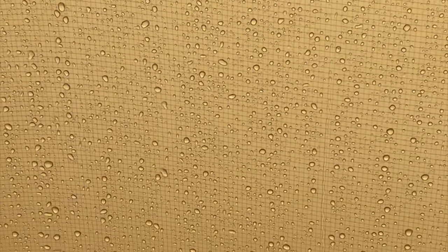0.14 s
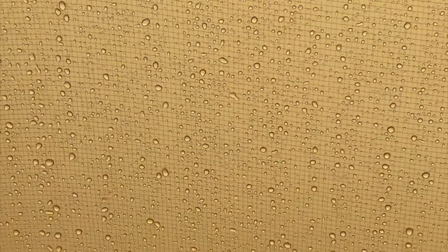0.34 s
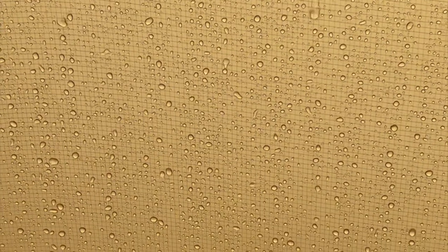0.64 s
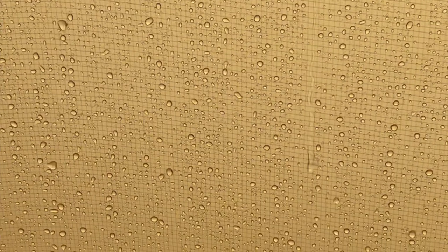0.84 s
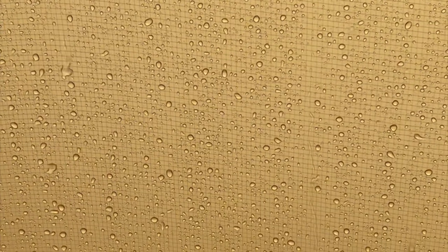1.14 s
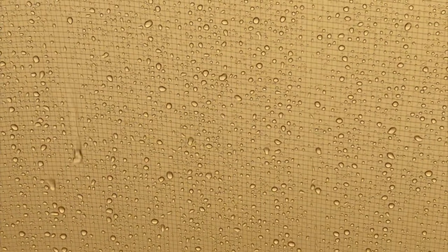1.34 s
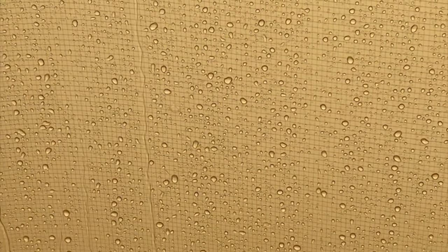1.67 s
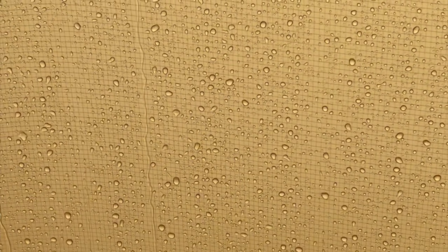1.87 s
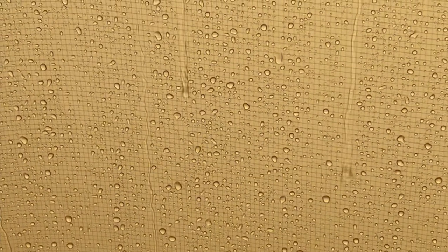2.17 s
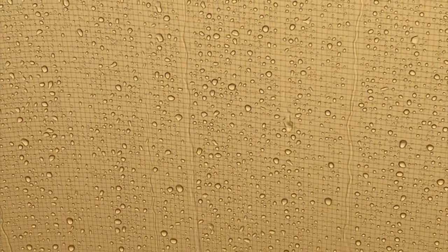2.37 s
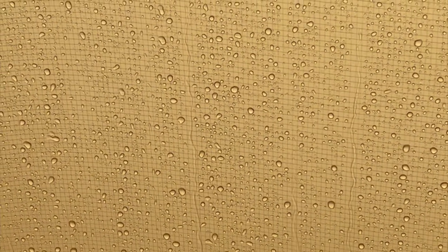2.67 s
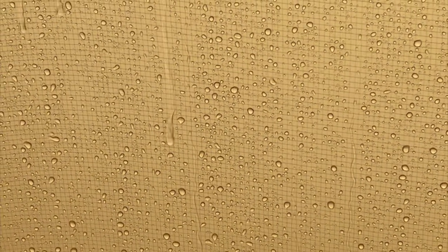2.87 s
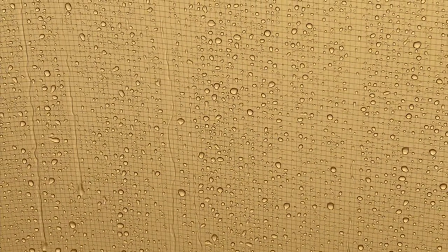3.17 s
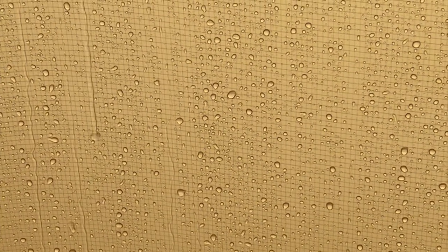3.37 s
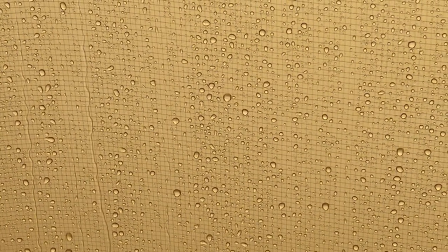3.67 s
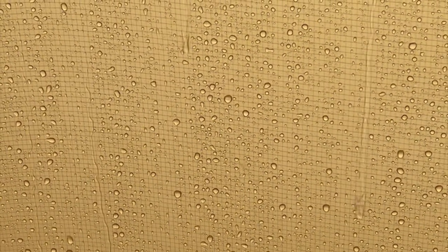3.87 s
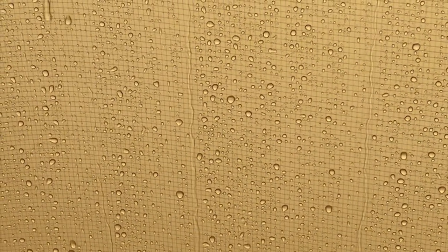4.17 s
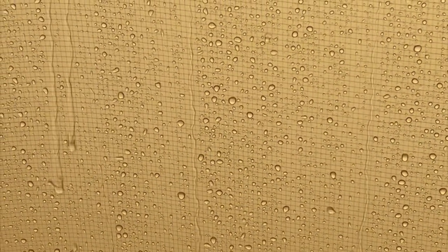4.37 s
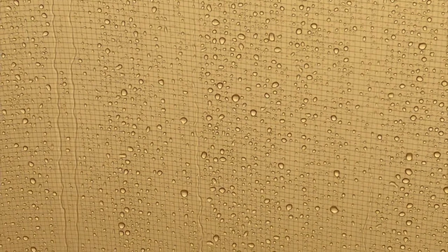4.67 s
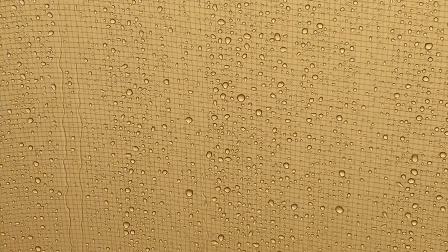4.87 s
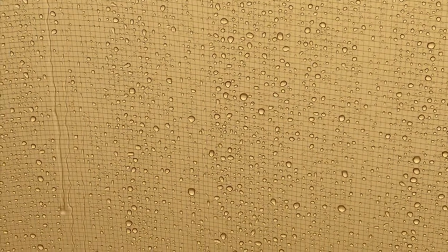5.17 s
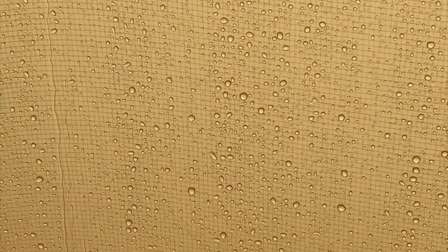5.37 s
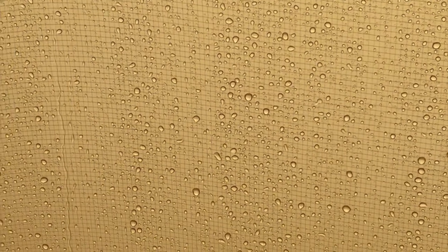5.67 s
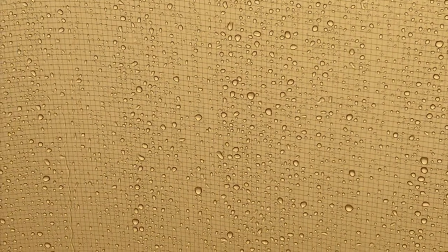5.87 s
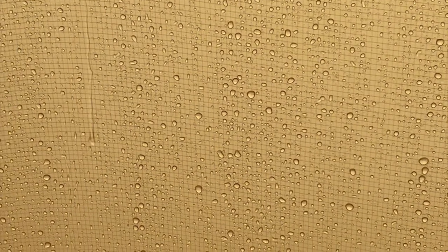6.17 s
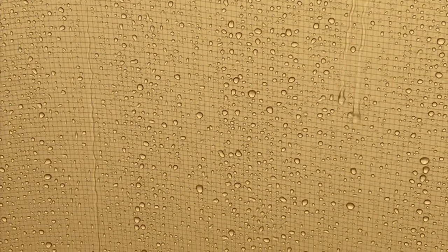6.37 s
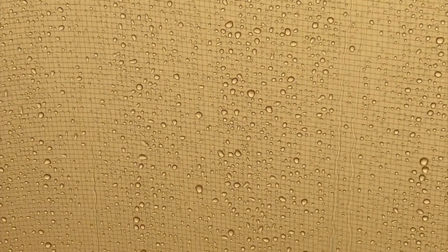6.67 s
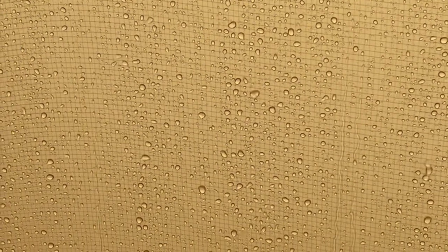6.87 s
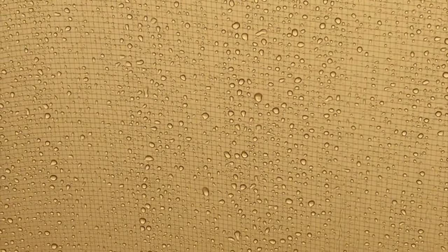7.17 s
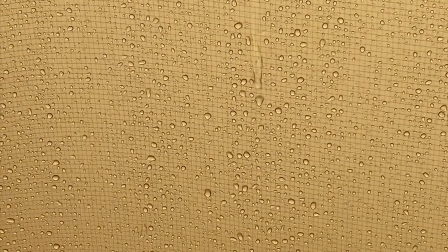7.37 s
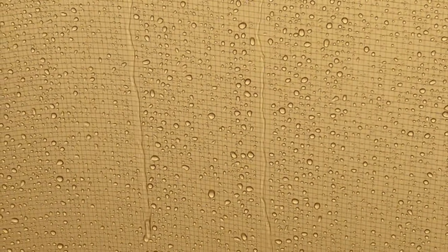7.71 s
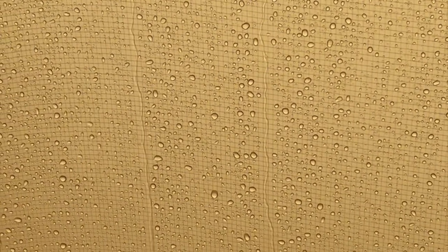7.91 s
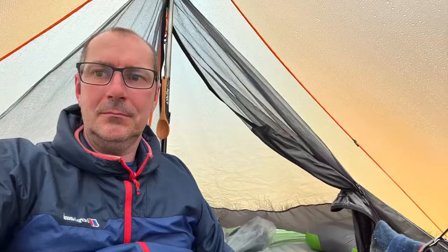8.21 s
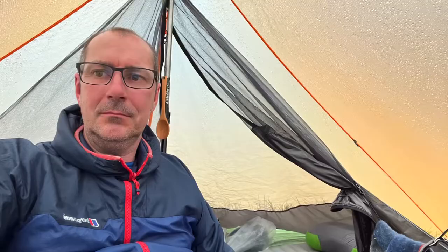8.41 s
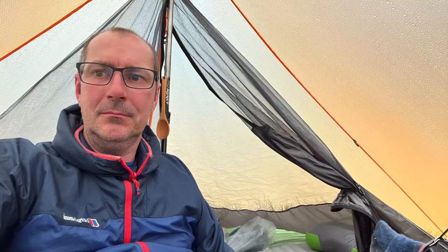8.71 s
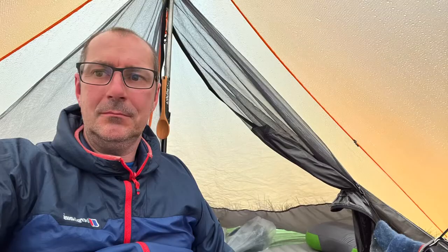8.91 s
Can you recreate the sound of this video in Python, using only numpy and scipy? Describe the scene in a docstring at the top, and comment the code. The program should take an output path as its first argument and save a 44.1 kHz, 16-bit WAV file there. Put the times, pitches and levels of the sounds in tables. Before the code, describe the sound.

Heavy rain on the taut cloth of a small tent, heard from inside with close stereo microphones. Countless tiny ticks and short fabric rattles merge into a dense, mid-bright wash. Occasional bigger drops tap hard nearby. The rain swells and eases slightly with gusts, weakens just after eight seconds, then cuts instantly to silence.

```python
"""Inside a small shelter of taut fabric: heavy rain, heard by a pair of close microphone ports.
Thousands of drops a second tap the cloth. Near ones are a tick and a short rattle, made of clicks
and fading noise; far ones merge into a wash of steady noise.
Gusts swell the rain; the sound is turned down near the end and then cut to silence."""
import sys
import numpy as np
from scipy import signal
from scipy.fft import rfft, irfft
from scipy.io import wavfile

SR = 44100
rng = np.random.default_rng(int(sys.argv[2]) if len(sys.argv) > 2 else 0)


def invert_db(x):
    """Field ratio 10**(x/20) for x, a level in decibels (scalar or array-like)."""
    u = np.asarray(x, float) / 20
    return 10 ** u


def inscribe(sig):
    """Save sig as 16-bit PCM at rate SR to the path in sys.argv[1].

    A 1-D sig is mono; a 2-D sig holds one channel per row.
    Samples are clipped to [-1, 1] before scaling.
    """
    pcm = np.round(np.clip(np.atleast_2d(sig).T, -1, 1) * 32767)
    wavfile.write(sys.argv[1], SR, pcm.astype(np.int16))


N = 399105
TIME_S = np.arange(N) / SR

# The heaviest drops, close by. The level is the peak aimed at; it sets their size against the other drops.
# Columns: t/s, level/dB
HEAVY_DROPS = [(0.133, -15), (0.189, -15), (0.575, -14.5), (1.22, -14), (1.35, -14), (1.492, -14.5),
               (1.878, -17.5), (2.306, -14), (3.133, -16), (4.606, -16.5), (4.781, -15.5), (4.825, -14.5),
               (5.825, -17), (6.622, -16.5), (7.145, -18)]


def drops(per_s, spread_db):
    """Drops land at random in clumps; most are small and a few much bigger. Gives a size where one lands."""
    smallest_db = 11   # peak of the smallest drop, taken over the level of the patter
    clumps = invert_db(1.5 * drift(9.0))
    lands = rng.random(N) < per_s * clumps / SR
    bigger_db = spread_db * np.minimum(rng.exponential(1, N), 3.0)
    sizes = lands * invert_db(bigger_db)
    heavy_s, peak_db = np.transpose(HEAVY_DROPS)
    at = (heavy_s * SR).astype(int)
    sizes[at] = invert_db(peak_db - rain_db()[at] - smallest_db)
    return sizes


def patter(sizes, tick_db, rattle_db, cycles, colour_db):
    """Each drop ticks, then the cloth rattles, losing 60 dB in some cycles of each band; far drops are a wash."""
    hz = np.fft.rfftfreq(N, 1 / SR) + 1   # the 1 avoids the log of zero
    band_hz = np.geomspace(60, 16000, 9)   # about an octave apart
    place = np.interp(np.log(hz), np.log(band_hz), np.arange(len(band_hz)))
    at = np.flatnonzero(sizes)
    signs = rng.choice([-1, 1], len(at))   # a tick may push or pull
    spectrum = 0
    for k, centre_hz in enumerate(band_hz):
        # every drop has a colour of its own: its strength varies from band to band
        ticks = np.zeros(N)
        ticks[at] = sizes[at] * invert_db(colour_db * rng.standard_normal(len(at)))
        fade = invert_db(-120 * centre_hz / (cycles * SR))   # power kept from one sample to the next
        rattle = np.sqrt(signal.lfilter([1 - fade], [1, -fade], ticks ** 2 + 1e-18))
        ticks[at] *= signs
        # steady wash and rattle share one noise; the 1 is the power of the wash
        loudness = np.sqrt(1 + invert_db(2 * rattle_db) * rms_one(rattle) ** 2)
        noise = rng.standard_normal(N) * loudness
        band = noise + invert_db(tick_db) * rms_one(ticks)
        band = band * invert_db(0.51 * drift(4.7))   # the strength of each band wavers slightly
        overlap = np.sqrt(np.clip(1 - abs(place - k), 0, 1))
        spectrum = spectrum + rfft(band) * overlap
    return spectrum, hz


# Tone of the sound the two ports share. Levels are per Hz and count only against each other.
# Columns: f/Hz, level/dB
COMMON_TONE = [(20, -50), (52, -15.5), (86, -11.5), (261, -10), (585, -.5), (1150, 0.5), (1750, -1),
               (2400, -3.5), (3000, -6.5), (4300, -10.5), (5900, -10.5), (8500, -14.5), (10100, -23),
               (11500, -23.5), (12100, -27), (12500, -34)]


def shared_sound(common, hz):
    """What both ports hear alike, with a narrow dip where the ports cancel."""
    dip_hz, width_hz, dip_db, top_hz = 4940, 400, -7, 12420
    dip = dip_db / (1 + (2 * (hz - dip_hz) / width_hz) ** 2)
    return common * invert_db(at_hz(COMMON_TONE, hz) + dip) * (hz < top_hz)


# Tone of what differs between the ports. Levels are per Hz, before a trim common to all of them.
# Columns: f/Hz, level/dB
DIFFERENCE_TONE = [(35, -51.5), (243, -23.5), (727, 1.5), (1330, -3), (1500, -13), (1950, -17),
                   (2400, -6.5), (2850, -4.5), (4030, -7), (5100, -3.5), (5700, -12.5), (7800, -12),
                   (10100, -11.5), (11500, -8), (13000, -10.5), (15800, -18.5)]
# Sound reaching one port first; the sign tells which port.
# Columns: f/Hz, share of the difference that is the common sound a quarter turn late [no unit]
LATE_SHARE = [(300, -.3), (1200, -.2), (2500, .08), (3600, .1), (4500, .48), (5000, .2), (5400, -.28),
              (7000, 0.), (8000, .68), (11800, .68)]


def port_difference(common, other, hz):
    """The ports differ partly by a delay, partly because other paths through the shelter reach them."""
    trim_db, top_hz = -10, 15760
    share = np.clip(at_hz(LATE_SHARE, hz), -1, 1)
    late = -1j * share * common   # -1j is the quarter turn
    other_paths = np.sqrt(1 - share ** 2) * other
    return (late + other_paths) * invert_db(at_hz(DIFFERENCE_TONE, hz) + trim_db) * (hz < top_hz)


# Strength of the rain, as the level of the patter in the shared sound.
# Columns: t/s, level/dB
RAIN_STRENGTH = [(0, -31), (.3, -32), (.85, -32), (1.35, -30), (1.8, -30), (2.05, -32), (2.8, -33),
                 (3.1, -32), (3.4, -33), (3.7, -35), (4.2, -33.5), (4.85, -31), (5.2, -32), (5.6, -32.5),
                 (6.6, -30.5), (7.0, -31), (7.4, -30.5), (7.7, -31.5), (7.85, -34.5), (8.17, -36)]


def rain_db():
    """Gusts make the rain stronger and weaker: its level at every sample."""
    s, level_db = np.transpose(RAIN_STRENGTH)
    return np.interp(TIME_S, s, level_db)


def gust_levels():
    """Thud and hiss swell and sink with the patter, each by its own share of the swing."""
    usual_patter_db, usual_thud_db, usual_hiss_db = -32, -43.5, -37.5
    thud_follows, hiss_follows = 0.78, 1   # share of the patter's swing
    patter_db = rain_db()
    swing_db = patter_db - usual_patter_db
    thud_db = usual_thud_db + thud_follows * swing_db
    hiss_db = usual_hiss_db + hiss_follows * swing_db
    return invert_db(np.array([thud_db, patter_db, hiss_db]))


def left_lean():
    """Share of the common sound tipped to the left; it grows near the end."""
    usual, from_s, per_s = .012, 7.42, .13
    return usual + per_s * np.clip(TIME_S - from_s, 0, None)


def three_ranges(spectrum, hz):
    """Thud (under 400 Hz), patter and hiss (over 3000 Hz) as signals that add up to the whole."""
    low = 1 / (1 + (hz / 400) ** 4)
    high = 1 / (1 + (3000 / hz) ** 4)
    middle = 1 - low - high
    return np.array([irfft(spectrum * part, N) for part in (low, middle, high)])


def drift(rate_hz):
    """Slow chance: noise at every 40th sample, smoothed twice by a one-pole low-pass; spread 1."""
    r = np.exp(-80 * np.pi * rate_hz / SR)
    noise = rng.standard_normal(N // 40 + 2002)
    slow = signal.lfilter([1], [1, -2 * r, r * r], noise)[2000:]   # skip the settling
    return np.interp(np.arange(N) / 40, np.arange(len(slow)), rms_one(slow))


def at_hz(points, hz):
    """A table over frequency, read on a log axis."""
    point_hz, value = np.transpose(points)
    return np.interp(np.log(hz), np.log(point_hz), value)


def rms_one(x):
    """Scale to rms 1."""
    return x / np.sqrt(np.mean(x ** 2) + 1e-20)


def scene():
    """The same drops reach both ports; shared sound plus and minus the difference gives left and right."""
    sizes = drops(per_s=2200.0, spread_db=3.0)
    common, hz = patter(sizes, tick_db=-7.5, rattle_db=-3.0, cycles=30.0, colour_db=3.0)
    other, hz = patter(sizes, tick_db=-8.5, rattle_db=-2.0, cycles=30.0, colour_db=1.5)
    differs = port_difference(common, other, hz)
    common = shared_sound(common, hz)
    mid = three_ranges(common, hz)
    gusts = gust_levels() / mid.std(axis=1, keepdims=True)
    apart = (hz < 5750) | (hz > 7550)   # between these, left and right are given no difference
    side = three_ranges(differs * apart, hz)
    side = side + left_lean() * three_ranges(common * apart, hz)
    mid = (gusts * mid).sum(axis=0)
    side = (gusts * side).sum(axis=0)
    return np.array([mid + side, mid - side])


def roll_off(x):
    """The treble ends steeply here."""
    return signal.sosfilt(signal.butter(12, 15910, fs=SR, output="sos"), x)


def record(dry):
    """The sound fades to silence within 1.3 ms."""
    cut_s, fade_s = 8.1778, 0.0013
    gate = np.clip((cut_s - TIME_S) / fade_s, 0, 1)
    return roll_off(dry * gate)


dry = scene()
out = record(dry)
inscribe(out)
```